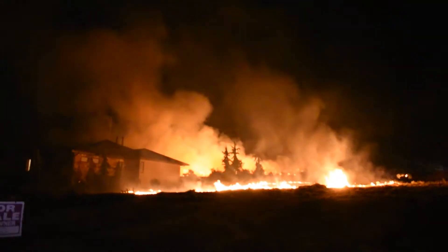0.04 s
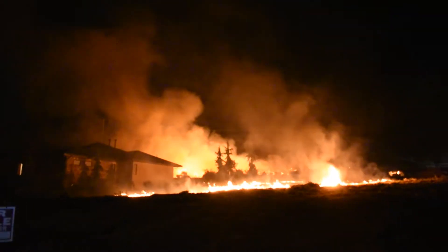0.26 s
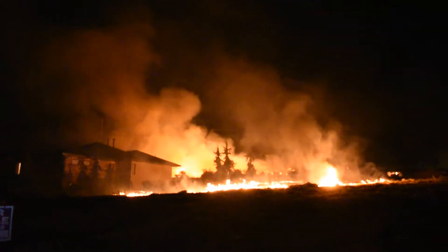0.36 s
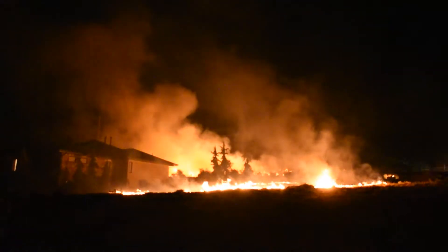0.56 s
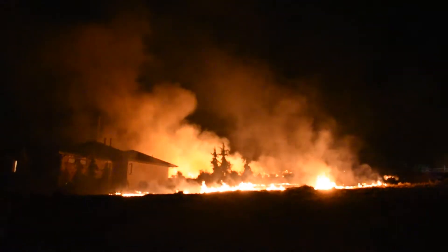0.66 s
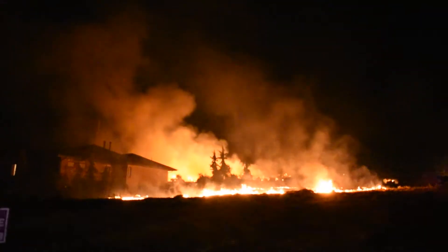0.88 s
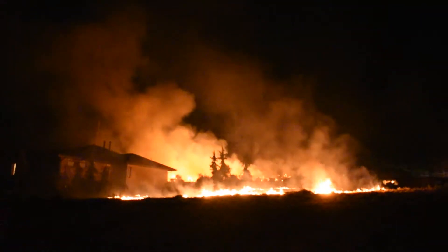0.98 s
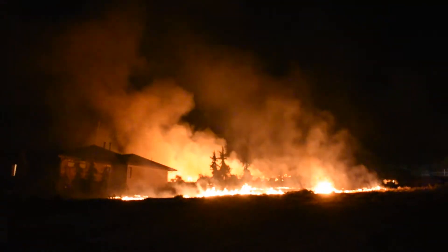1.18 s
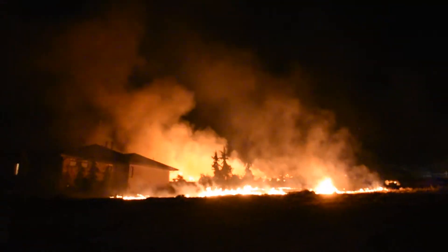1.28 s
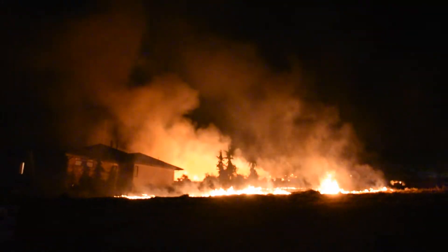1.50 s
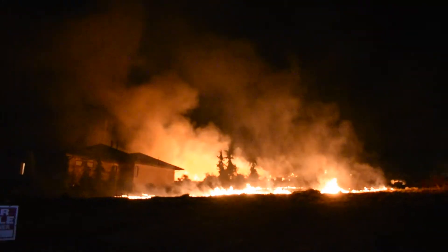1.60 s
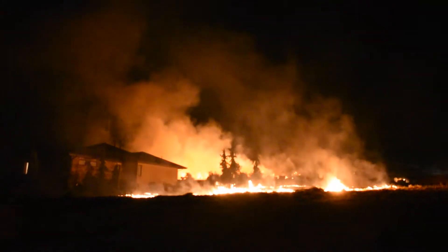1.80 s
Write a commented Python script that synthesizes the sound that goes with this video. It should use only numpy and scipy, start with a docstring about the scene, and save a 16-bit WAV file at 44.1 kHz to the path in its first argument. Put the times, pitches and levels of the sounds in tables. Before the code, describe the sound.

Far-off fire burning with a soft roar, sharp snaps and low wind thumps on the microphone.

```python
"""A soft far roar and sizzle with a few sharp snaps: a grass fire crossing a field at night.
The flames are flickering noise bands plus tiny ringing clicks; bursting wood rings at two pitches.
Crickets in chorus blur into narrow noise bands, and engines hum far away.
Gusts and eddies hit the microphone as low, ragged thumps; the hardest push its limiter down."""
import sys
import numpy as np
from scipy import signal
from scipy.io import wavfile
from scipy.ndimage import uniform_filter1d

SR = 44100
rng = np.random.default_rng(int(sys.argv[2]) if len(sys.argv) > 2 else 0)


def dump(signal):
    """Clip the signal to [-1, 1] and save it as 16-bit WAV at the path in sys.argv[1]."""
    limited = np.clip(np.atleast_2d(signal).T, -1, 1)
    pcm = np.round(limited * 32767).astype(np.int16)
    wavfile.write(sys.argv[1], SR, pcm)


N = 81585
T = np.arange(N) / SR


def from_db(db):
    """Decibels to gain."""
    return 10 ** (np.asarray(db) / 20)


def unit_rms(x):
    """Scale to rms 1."""
    return x / np.sqrt(np.mean(x ** 2) + 1e-20)


def curves(rows):
    """Interpolate (time [s], values...) rows to every sample."""
    times_s, *columns = np.transpose(rows)
    return [np.interp(T, times_s, column) for column in columns]


def butter(x, hz, kind, order=2):
    """Causal Butterworth filter."""
    sos = signal.butter(order, np.clip(hz, 10, .45 * SR), kind, fs=SR, output="sos")
    return signal.sosfilt(sos, x + 1e-18)


def resonate(x, hz, q):
    """Two-pole resonator, unit peak gain."""
    r = np.exp(-np.pi * hz / q / SR)
    feedback = [1, -2 * r * np.cos(2 * np.pi * hz / SR), r * r]
    return signal.lfilter(np.array([1, 0, -1]) * (1 - r * r) / 2, feedback, x + 1e-18)


def drift(rate_hz):
    """Slow random wander, rms 1."""
    return unit_rms(butter(rng.standard_normal(2 * N), rate_hz, "low")[N:])


def narrow_noise(hz, width_hz):
    """Many like voices blurred into one band, rms 1."""
    band_hz = [hz - width_hz / 2, hz + width_hz / 2]
    return unit_rms(butter(rng.standard_normal(2 * N), band_hz, "band")[N:])


def banded_noise(spectrum, flicker_db):
    """Third-octave noise bands, each flickering independently; rms 1."""
    hz, db = np.transpose(spectrum)
    edges_hz = 18 * 2 ** (np.arange(31) / 3)
    white = rng.standard_normal((2, N + SR // 2))
    out = np.zeros(N)
    for k, (low, high) in enumerate(zip(edges_hz, edges_hz[1:])):
        level_db = np.interp(np.log(low * high) / 2, np.log(hz), db, right=-120)
        band = butter(white[k % 2], [low, high], "band")[-N:]
        out += from_db(level_db + flicker_db * drift(rate_hz=36)) * band
    return unit_rms(out)


def add(out, start_s, sound, peak_db):
    """Mix in a short sound at a given peak level."""
    i = max(int(start_s * SR), 0)
    out[i:i + len(sound)] += (from_db(peak_db) * sound / np.abs(sound).max())[:N - i]


def crackle(rate_per_s):
    """Tiny random clicks, each ringing at one of ten pitches; rms 1."""
    size_db = 2 * np.minimum(rng.exponential(1, N), 3.5)
    clicks = from_db(size_db) * rng.choice([-1, 1], N)
    clicks *= rng.random(N) < rate_per_s / SR
    pitches_hz = np.geomspace(3000, 8200, num=10)
    pitch_index = rng.integers(0, len(pitches_hz), N)
    rings = sum(resonate(clicks * (pitch_index == k), hz, q=7.3) for k, hz in enumerate(pitches_hz))
    return unit_rms(butter(rings, 9400, "low", order=4))


def fire():
    """Flames roar low and sizzle high; their vigour sets the level and the crackle rate."""
    # fire vigour: (time [s], gain [dB])
    blaze = [(0, 2.5), (.25, 1.5), (.6, 0), (.9, -0.5), (1.3, 0), (1.55, 1), (1.85, 1)]
    # flame spectra: (frequency [Hz], relative density [dB])
    roar_spectrum = [(20, -22), (45, 4), (80, 3), (160, -1), (300, -7.5), (520, -9), (680, -10.5),
                     (880, -8), (1400, -16), (2100, -19.5), (3500, -23), (6000, -51.5)]
    sizzle_spectrum = [(1500, 6.5), (3000, 2.5), (4200, 1.5), (5100, 1), (6200, 2), (7900, -1), (9300, -13),
                       (12000, -13), (16000, -25.5)]
    vigour = from_db(curves(blaze)[0])
    crackles = from_db(-61.5) * crackle(rate_per_s=310 * vigour)
    roar = from_db(-44) * banded_noise(roar_spectrum, flicker_db=2)
    sizzle = from_db(-56) * banded_noise(sizzle_spectrum, flicker_db=1.56)
    return vigour * (roar + sizzle + crackles)


def crickets():
    """A chorus swells and fades on one pitch; a fainter, higher kind holds steady."""
    # chorus swell: (time [s], level [dB])
    swell = [(0, -58), (.07, -51), (.25, -48.5), (.32, -48), (.42, -51.5), (.6, -50.5), (.68, -46.5),
             (.74, -50), (.79, -46.5), (.88, -55.5), (1.05, -51), (1.18, -47.5), (1.28, -52.5),
             (1.45, -54.5), (1.56, -51.5), (1.7, -47.5), (1.85, -50.5)]
    level_db, = curves(swell)
    chorus = from_db(level_db) * narrow_noise(2593, width_hz=181)
    high_chorus = from_db(-59.5) * narrow_noise(3313, width_hz=370)
    return chorus + high_chorus


def engines():
    """One far engine idles, another swells and eases off in pitch; a thin whine comes and goes."""
    # engine easing off: (time [s], firing rate [Hz], level [dB])
    easing = [(0, 136, -77), (.3, 130, -67), (1.3, 129, -39.5), (1.42, 125.3, -36), (1.56, 128.2, -39),
              (1.66, 117, -46), (1.85, 109, -73)]
    # far whine: (time [s], level [dB])
    whine_swell = [(0, -82), (.13, -65), (.165, -43), (.24, -45), (.28, -58), (.45, -51.5), (.62, -60.5),
                   (1.85, -87)]
    firing_hz, hum_db = curves(easing)
    whine_db, = curves(whine_swell)
    idle = from_db(-42.5) * narrow_noise(83.9, width_hz=12.8)
    hum = from_db(hum_db) * np.sqrt(2) * np.sin(2 * np.pi * np.cumsum(firing_hz) / SR)
    whine = from_db(whine_db) * narrow_noise(1172, width_hz=146)
    return idle + hum + whine


def snaps():
    """Wood bursts: a sharp break and brief splintering drive two rings and a knock; far ones are duller."""
    # (time [s], peak [dB], low ring [Hz], high ring [Hz], high re low [dB], t60 [s], low-pass [Hz])
    bursts = [(0.0361, -27, 2700, 2950, -29, 0.012, 3600), (0.049, -34.5, 1800, 2100, -15, 0.011, 2500),
              (0.1119, -23, 1190, 3000, -4, 0.014, 3500), (0.237, -37, 5200, 7500, 12, 0.012, 8000),
              (0.442, -34.5, 5800, 7900, 3.5, 0.012, 8000), (0.484, -33.5, 4140, 6940, 0, .004, 10000),
              (0.683, -29, 6500, 7900, 2.5, 0.0043, 7700), (1.3347, -17, 1920, 5760, 1, .003, 12400),
              (1.438, -18.5, 1286, 6900, -22, 0.0026, 7500), (1.537, -36, 5280, 6850, -3, 0.0041, 7000),
              (1.579, -29.5, 6650, 7800, -16, 0.0023, 8000), (1.608, -33, 4100, 6400, 0, 0.0052, 7000)]
    break_db, knock_db, knock_hz = 15, -9.5, 825
    tail_db, tail_t60_s = -19.5, 0.08
    out, t = np.zeros(N), T[:SR // 10]
    for time_s, peak_db, low_hz, high_hz, high_db, t60_s, cutoff_hz in bursts:
        decay = from_db(-60 * t / t60_s) + from_db(tail_db - 60 * t / tail_t60_s)
        crack = rng.standard_normal(len(t)) * decay
        crack[0] += from_db(break_db)
        low_ring = unit_rms(resonate(crack, low_hz, q=4.3))
        high_ring = from_db(high_db) * unit_rms(resonate(crack, high_hz, q=5.3))
        knock = from_db(knock_db) * unit_rms(butter(crack, knock_hz, "low"))
        snap = butter(low_ring - high_ring - knock, cutoff_hz, "low", order=3)
        add(out, time_s, snap, peak_db)
    return out


def gusts():
    """Each gust is a patch of lumpy low turbulence at the microphone port."""
    # gusts: (start [s], length [s], level [dB])
    patches = [(0.181, 0.075, -31), (0.297, 0.083, -31), (0.433, 0.06, -25.5), (.532, 0.063, -32.5),
               (0.683, 0.067, -30.5), (0.867, 0.088, -27), (0.976, 0.121, -26.5), (1.114, 0.19, -22),
               (1.353, .065, -30.5), (1.412, .05, -38), (1.699, 0.02, -43)]
    # turbulence spectrum: (frequency [Hz], relative density [dB])
    spectrum = [(20, -4), (40, -8), (80, -1), (130, 2.5), (220, -7), (350, -20), (550, -30), (900, -43),
                (2000, -43)]
    edge_s, lump_db = 0.0065, 8
    flow = np.zeros(N)
    for start_s, length_s, level_db in patches:
        inside_s = np.minimum(T - start_s, start_s + length_s - T)
        flow += from_db(level_db) * np.clip(inside_s / edge_s + .5, 0, 1)
    turbulence = banded_noise(spectrum, flicker_db=0.5)
    lumps = from_db(lump_db * np.tanh(drift(rate_hz=48.4)))
    return flow * unit_rms(turbulence * lumps)


def eddies():
    """An eddy hits the port with a few milliseconds of random pressure: a dull thump."""
    # eddy hits: (time [s], peak [dB], low-pass [Hz])
    hits = [(0.202, -16.5, 363), (0.224, -18.5, 417), (0.235, -17, 444), (0.301, -19.5, 352),
            (0.353, -14.5, 410), (.363, -17, 433), (0.443, -18, 273), (0.455, -17, 390), (0.48, -23, 460),
            (0.573, -23, 278), (.729, -27, 318), (0.765, -28, 330), (.988, -16, 510), (1.005, -4, 331),
            (1.029, -17, 460), (1.049, -11, 230), (1.071, -13.5, 549), (1.079, -10, 260),
            (1.126, -11.5, 370), (1.164, -13.5, 560), (1.17, -10, 250), (1.195, -4.5, 331),
            (1.202, -6, 555), (1.22, -7, 554), (1.249, -9, 530), (1.27, -3, 343), (1.403, -20, 400),
            (1.421, -23.5, 253), (1.46, -21, 260), (1.496, -18, 312)]
    length_s, highpass_hz = 0.00822, 97.2
    out, t = np.zeros(N), T[:SR // 10]
    window = np.sin(np.pi * np.minimum(t / length_s, 1)) ** 2
    for time_s, peak_db, cutoff_hz in hits:
        pressure = rng.standard_normal(len(t)) * window
        thump = butter(pressure, cutoff_hz, "low", order=4)
        thump = butter(thump, cutoff_hz / 2, "low", order=1)
        thump = butter(thump, highpass_hz, "high")
        add(out, time_s - length_s / 2, thump, peak_db)
    return out


def scene():
    """All sources at one microphone."""
    return (fire() + crickets() + engines() + snaps() + gusts() + eddies())[None]


def record(dry):
    """Bass roll-off, a limiter that ducks on the hardest thumps, clipping of their tips, treble cut."""
    highpass_hz, lowpass_hz, clip_level = 30.6, 16800, 0.37
    threshold_db, attack_s, release_db_per_s = -8.5, 0.0031, 47
    x = butter(dry, highpass_hz, "high")
    over_db = np.maximum(20 * np.log10(np.abs(x[0]) + 1e-9) - threshold_db, 0)
    release_db = release_db_per_s * T
    held_db = np.maximum.accumulate(over_db + release_db) - release_db
    gain = from_db(-uniform_filter1d(held_db, int(attack_s * SR)))
    clipped = np.clip(x * gain, -clip_level, clip_level)
    return signal.sosfilt(signal.cheby2(16, 70, lowpass_hz, fs=SR, output="sos"), clipped)


dry = scene()
out = record(dry)
dump(out)
```